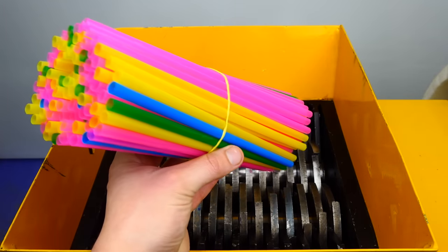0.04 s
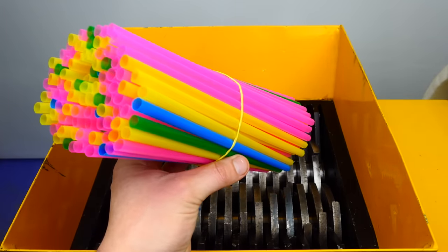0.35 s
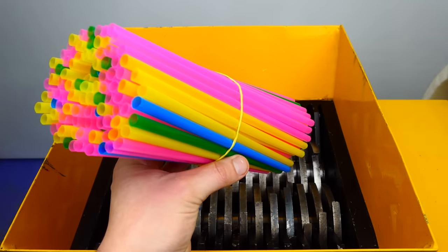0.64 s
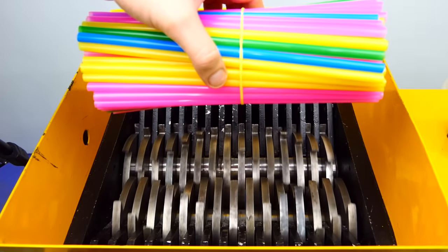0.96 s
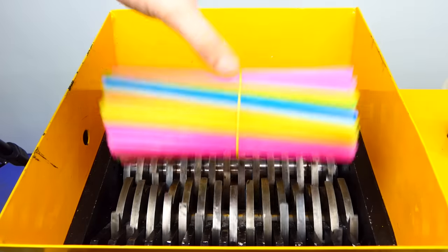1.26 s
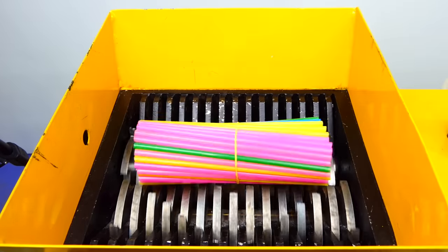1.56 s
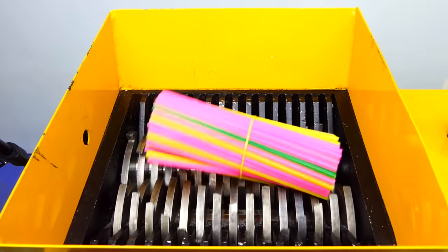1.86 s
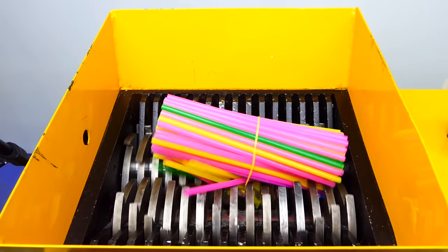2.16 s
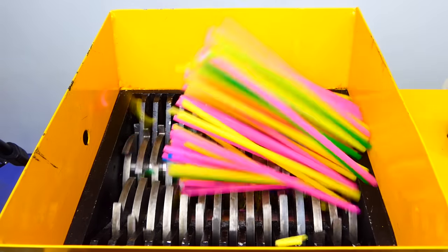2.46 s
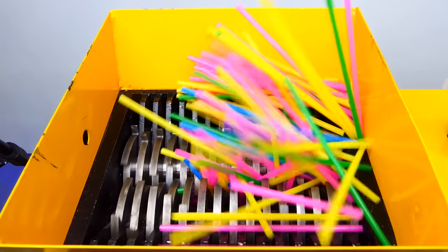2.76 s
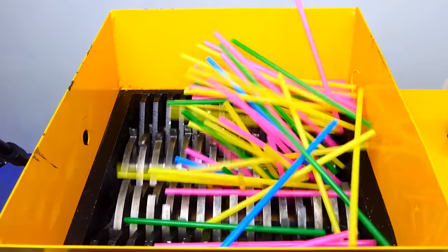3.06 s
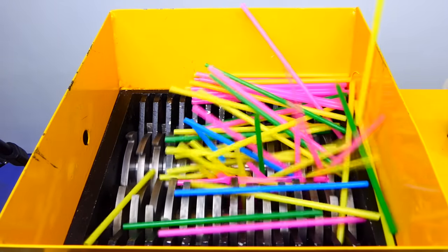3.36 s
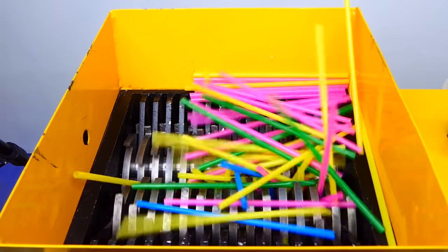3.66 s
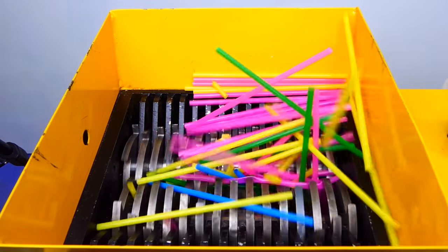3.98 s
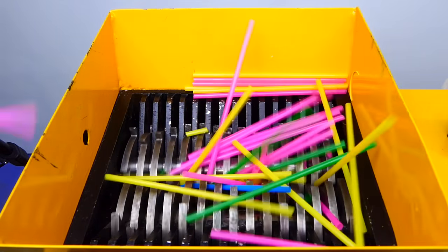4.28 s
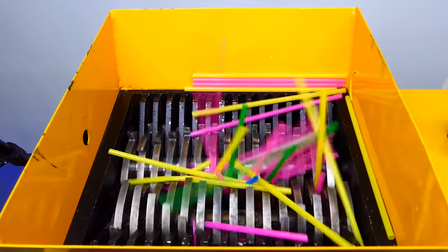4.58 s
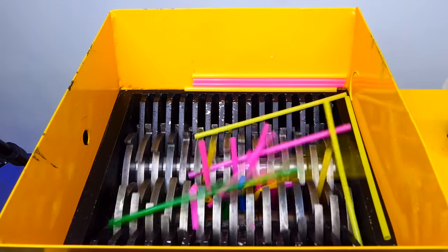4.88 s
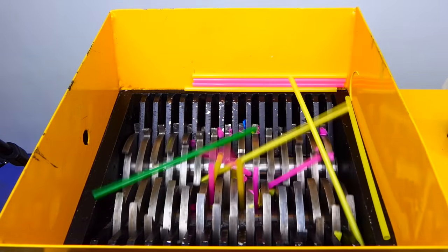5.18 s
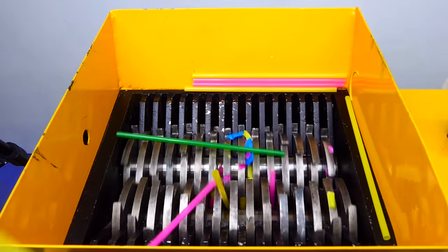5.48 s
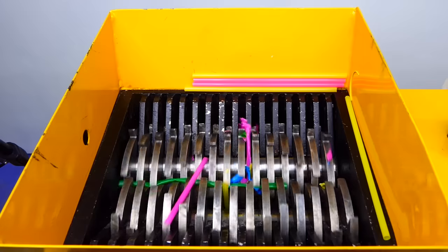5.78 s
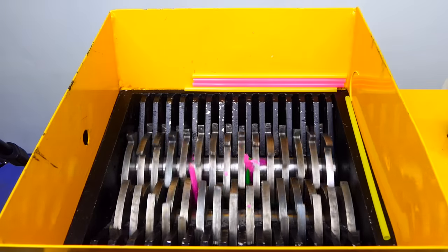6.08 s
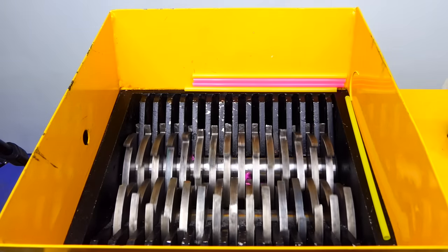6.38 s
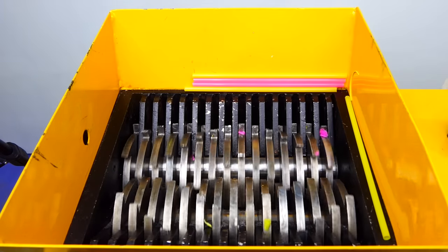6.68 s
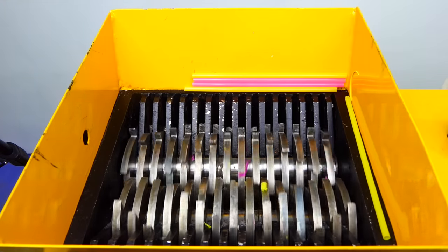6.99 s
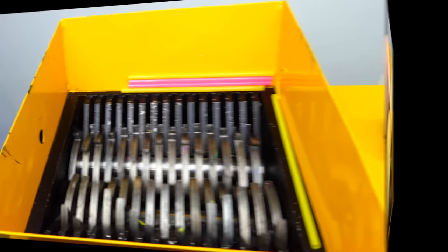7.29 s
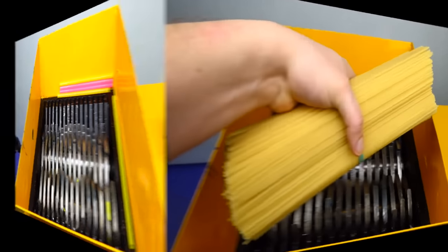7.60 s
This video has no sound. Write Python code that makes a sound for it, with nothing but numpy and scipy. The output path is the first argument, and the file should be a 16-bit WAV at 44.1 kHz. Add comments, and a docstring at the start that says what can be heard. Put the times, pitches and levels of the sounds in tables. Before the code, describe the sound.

Plastic straws slap onto a humming shredder's steel cutters, then crunch, crackle and snap loudly until little but the hum remains.

```python
"""Close microphone at the steel hopper of a twin-shaft shredder in a workshop.
After a short silence the gearbox hums and the empty cutters rub. At 1.4 s a bundle of plastic straws
drops in. The cutters crush the tubes into a dense crackle and snap them one by one, clipping the louder
left channel; the tight bundle groans as it gives way. From about 5 s the crackle thins out,
until only the gearbox hum is left."""
import sys
import numpy as np
from scipy import signal
from scipy.fft import rfft, irfft, next_fast_len
from scipy.io import wavfile
from scipy.ndimage import uniform_filter1d, map_coordinates

SR = 44100
rng = np.random.default_rng(int(sys.argv[2]) if len(sys.argv) > 2 else 0)


def log_audio(samples):
    """Write samples as a 16-bit WAV file to the path given in sys.argv[1]."""
    # one column per channel
    frames = np.atleast_2d(samples).T
    # limit to full scale, then quantise
    limited = np.clip(frames, -1, 1)
    pcm = np.round(limited * 32767).astype(np.int16)
    wavfile.write(sys.argv[1], SR, pcm)


N = 341378

# colour of breaking plastic in the hopper: (frequency [Hz], level [dB])
PLASTIC_SPECTRUM = [(20, -5.5), (100, -23), (250, -9.5), (450, -4), (700, -0.5), (1050, -5.5), (1400, -3),
                    (2100, 0.5), (2600, 0), (3450, 4.5), (4600, -3), (7000, 0), (10500, -3.5),
                    (13000, -2.5), (16000, -4.5)]
# straws that break with a loud snap: (time [s], crack level [dB], brightness [dB])
LOUD_SNAPS = [(1.735, -14, -13), (1.915, -11, -1), (1.938, -3.5, 8), (1.984, -7.5, 2.5), (2.033, -9, 3),
              (2.089, -4, 6), (2.118, -10, -10), (2.156, -11, -8), (2.185, -6.5, -2), (2.219, -8.5, -11),
              (2.328, -14, -8), (2.482, -5, -1), (2.551, -5, -5), (2.579, -7.5, 15), (2.607, -7, 5),
              (2.636, -6, 6), (2.699, -5, 5), (2.73, -7.5, 2), (2.802, -9, 0), (2.883, -6.5, -5),
              (2.978, -6, -3), (3.111, -10, 16), (3.126, -5.5, 19), (3.277, -8, 13), (3.357, -6.5, -21),
              (3.405, -4.5, -5), (3.456, -7.5, -3), (3.549, -9, 5), (3.585, -7, -5), (3.642, -7.5, -9),
              (3.665, -9, 0), (3.778, -6.5, -3), (3.856, -9.5, -5), (3.939, -9.5, -8), (4.069, -3.5, -4),
              (4.083, -13, 2), (4.166, -11, 15), (4.2, -7.5, 2), (4.25, -13, -6), (4.262, -10, 19),
              (4.314, -8.5, -2.5), (4.352, -10.5, -4), (4.436, -16, 17), (4.545, -6, 3), (4.593, -8.5, 2),
              (4.609, -7.5, 6), (4.689, -9, -5), (4.734, -11.5, 1), (4.831, -13, 15), (4.881, -10.5, 14),
              (4.97, -13.5, -6), (5.056, -19, 15), (5.076, -12, -22), (5.089, -12.5, -20),
              (5.115, -13.5, 8), (5.247, -17, -7), (5.306, -13.5, 1), (5.347, -12.5, 5), (5.383, -17.5, 10),
              (5.423, -20, 0), (5.79, -18.5, -6), (5.835, -8, 5), (5.853, -8, -1), (5.913, -9.5, 4),
              (5.94, -12.5, 6), (5.981, -18.5, 14), (6.105, -15.5, -5), (6.298, -15, -12),
              (6.355, -18.5, -11), (6.49, -33, -15), (6.543, -26, -21), (6.623, -24, -11),
              (7.089, -25.5, -14), (7.399, -26.5, 1)]
LANDING_S, FULL_LOAD_DB = 1.371, -18


def straws():
    """Buckling walls crackle; each snap is a crack and a hollow pop, then the rasp of the tearing tube."""
    def burst(power, low_hz, high_hz):
        noise = np.sqrt(np.abs(power)) * rng.standard_normal(N)
        return colour(noise, lambda f: shape(PLASTIC_SPECTRUM, f) * band(f, low_hz, high_hz))

    crumple_db, crunch_db, crackle_db = cutter_load()
    landed = np.arange(N) / SR > LANDING_S
    low_power, mid_power, high_power = [amp(db) ** 2 * landed for db in (crumple_db, crunch_db, crackle_db)]
    crack_mid, crack_high, hollow = snaps(list(LOUD_SNAPS) + lesser_snaps(crunch_db, crackle_db))
    tear_mid, tear_high = tears()
    grain = fractures(per_s=2000, spread_db=3.5, clump_db=2.5, life_s=0.00039)  # shared by all bands
    crushing = mid_power * amp(0.5) + tear_mid
    crumple = burst(low_power * (1 + grain) / 2 + amp(-19) ** 2 * (crack_mid + tear_mid), 46, 1050)
    crunch = burst(crushing * (0.14 + 0.25 * grain) + crack_mid, 950, 4340)
    buckles = np.sqrt(crushing) * amp(-5.5) * buckling(960, 4368, t60=0.018, spread_db=7.5)
    splitting = high_power * amp(1) + tear_high
    crackle = burst(splitting * 0.64 * grain + crack_high, 3500, 18500)
    splinters = np.sqrt(splitting) * amp(-10) * buckling(4420, 15250, t60=0.054, spread_db=2)
    return crumple + crunch + buckles + crackle + splinters + hollow


def cutter_load():
    """Crumple, crunch and crackle in dB: they swell as each row of teeth bites; more load is brighter."""
    # how hard the cutters work on the straws: (time [s], level [dB])
    load = [(1.42, -32), (1.85, -27.5), (2.0, -24.5), (2.1, -20), (3.1, -18), (3.25, -19), (3.7, -19),
            (4.3, -21.5), (4.72, -26), (4.9, -21.5), (5.4, -30), (5.9, -31), (6.15, -32), (6.35, -31.5),
            (6.5, -36), (6.8, -39.5), (7.3, -42.5), (7.7, -61)]
    # low crumple, strongest while the bundle is still tight: (time [s], level [dB])
    crumple = [(1.4, -42), (1.6, -29.5), (2.15, -28), (3.3, -31.5), (3.7, -39), (4.95, -38.5), (5.5, -43),
               (6.2, -55.5), (7.4, -43), (7.7, -63)]
    bite_period_s, bite_at_s, first_split_s = 0.2449, 4.08, 1.91
    t = np.arange(N) / SR
    bite_db = 0.75 * np.cos(2 * np.pi * (t - bite_at_s) / bite_period_s)
    load_db = curves(load)[0] + bite_db
    crackle_db = FULL_LOAD_DB + 1.26 * (load_db - FULL_LOAD_DB) - 7.5 * (t < first_split_s)
    return curves(crumple)[0] + bite_db, load_db, crackle_db


def snaps(rows):
    """Breaking straws: the mid and treble power of their cracks, and the hollow pop of the tubes."""
    tube_hz, mid_t60, treble_t60, tube_t60 = 3426, 0.026, 0.0083, 0.014
    mid, high, hollow = np.zeros((3, N))
    t = np.arange(SR // 12) / SR
    pitches = tube_hz * np.exp(0.059 * rng.standard_normal(400))
    attack = 1 - np.exp(-t / 0.00026)
    for (s, crack_db, bright_db), hz in zip(rows, pitches):
        treble = treble_share(bright_db)
        add(mid, s, (1 - treble) * amp(crack_db + 2.5 - 60 * t / mid_t60) ** 2)
        add(high, s, treble * amp(crack_db + 8.5 - 60 * t / treble_t60) ** 2)
        envelope = np.sqrt(1 - treble) * amp(crack_db + 3.5 - 60 * t / tube_t60) * attack
        add(hollow, s, envelope * np.sin(2 * np.pi * hz * t))
    return mid, high, hollow


def lesser_snaps(crunch_db, crackle_db):
    """Small random breaks, as rows like LOUD_SNAPS: more frequent, louder and brighter under load."""
    full_load_per_s = 22
    rows = []
    for k, (shift, size, tone, luck) in enumerate(rng.uniform(-1, 1, (300, 4))):
        s = LANDING_S + (k + 2 + shift) / full_load_per_s
        at = int(s * SR)
        if at < N and abs(luck) < amp(.45 * (crunch_db[at] - FULL_LOAD_DB)):
            bright_db = crackle_db[at] - crunch_db[at] + 3 + 1.5 * tone
            rows.append((s, crunch_db[at] + 6.5 + 4.5 * size, bright_db))
    return rows


def tears():
    """Mid and treble power of tearing tubes: long rips, and a shorter rasp after each loud snap."""
    # straws that a tooth drags and rips open: (time [s], rasp level [dB], brightness [dB])
    long_rips = [(1.458, -20, -12), (1.612, -20.5, -28), (1.665, -17.5, -8), (1.828, -17.5, -10),
                 (2.066, -11, -3), (2.117, -10, -2), (2.186, -13, -7), (2.22, -10.5, -3), (2.267, -10, 1.5),
                 (2.315, -9, 0), (2.367, -11, 3), (2.415, -7, 0), (2.481, -10, 3), (2.73, -25, 5),
                 (2.823, -9, 8), (3.026, -11, -4), (3.052, -9.5, -2), (3.077, -10, 2), (3.292, -17, 4),
                 (3.404, -10, -13), (3.559, -12, -1), (3.585, -30, -8), (3.624, -12.5, -7),
                 (3.663, -15.5, -3), (3.778, -25, -4), (3.837, -11.5, -7), (4.022, -13, -1),
                 (4.059, -12, -5), (4.084, -12.5, 11), (4.53, -12.5, -2), (4.595, -24, -4),
                 (4.639, -17.5, 0), (4.666, -17, -6), (4.734, -19, -3), (4.864, -12, -1.5),
                 (5.054, -22, 14), (5.147, -17.5, -4), (5.258, -16, 0), (5.638, -23, -9),
                 (5.836, -10.5, -1), (5.914, -20, 7.5), (6.012, -17, 6.5), (6.155, -27, -7),
                 (6.277, -12, -7.5), (6.312, -22, -3), (6.875, -29, -1), (7.155, -33, -2)]
    long_t60, short_t60 = 0.078, .05
    rips = [(s, db, bright_db, long_t60) for s, db, bright_db in long_rips]
    rips += [(s, db - 9.5, bright_db, short_t60) for s, db, bright_db in LOUD_SNAPS]
    mid, high = np.zeros((2, N))
    t = np.arange(SR // 12) / SR
    for s, db, bright_db, t60 in rips:
        treble = treble_share(bright_db)
        rasp = amp(db - 60 * np.maximum(t - .011, 0) / t60) ** 2 * np.minimum(t / 0.0017, 1)
        add(mid, s, (1 - treble) * rasp * amp(1) ** 2)
        add(high, s, treble * rasp)
    return mid, high


def fractures(per_s, spread_db, clump_db, life_s):
    """Power of countless tiny breaks, in clumps, with a local mean of 1."""
    sizes = amp(spread_db * np.minimum(rng.standard_normal(N), 2.3) + clump_db * wobble(110))
    impulses = (rng.random(N) < per_s / SR) * sizes ** 2
    power = signal.lfilter([1], [1, -np.exp(-1 / (life_s * SR))], impulses)
    return power / local_mean(power)


def buckling(low_hz, high_hz, t60, spread_db, count=4000):
    """Many small buckles, each ringing at its own pitch and cut off within 7 ms, at a local rms of 1."""
    when, pitch, phase = rng.random((3, count, 1))
    size = amp(spread_db * np.minimum(rng.standard_normal((count, 1)), 2))
    age = np.arange(SR // 150)
    hz = low_hz + (high_hz - low_hz) * pitch
    rings = size * amp(-60 * age / SR / t60) * np.sin(2 * np.pi * (hz * age / SR + phase))
    scattered = np.bincount(((when * N).astype(int) + age).ravel(), rings.ravel(), N)[:N]
    plastic = colour(scattered, lambda f: shape(PLASTIC_SPECTRUM, f))
    return plastic / np.sqrt(local_mean(plastic ** 2))


def pops_and_knocks():
    """Further hollow pops of snapping tubes near 3.5 kHz, each with its own pitch, and knocked scraps and teeth
    ring briefly, a little off a pure tone."""
    # further hollow pops of snapping tubes, and ringing scraps and teeth: (time [s], level [dB], pitch [Hz],
    # t60 [s])
    rings = [(2.033, -3, 3570, 0.026), (3.111, 0, 3650, 0.028), (3.29, -4, 3230, .035),
             (3.412, -5.5, 1177, 0.067), (3.642, -2.5, 3270, 0.045), (3.857, -10, 2980, .04),
             (3.938, -4, 2730, 0.038), (4.203, -12.5, 1322, 0.077), (4.951, -18.5, 454, 0.1),
             (5.292, -13.5, 1665, 0.058), (5.84, -8, 1148, 0.05), (5.853, 6.5, 3590, 0.026),
             (6.29, -9.5, 1232, 0.19), (7.299, -18, 1810, 0.075), (7.421, -22, 1815, 0.081)]
    out, t = np.zeros(N), np.arange(SR // 4) / SR
    attack = 1 - np.exp(-t / 0.00069)
    for s, db, hz, t60 in rings:
        drift = 0.05 * np.cumsum(rng.standard_normal(len(t)))
        add(out, s, amp(db - 60 * t / t60) * attack * np.sin(2 * np.pi * hz * t + drift))
    return out


def landing():
    """The bundle slaps onto the cutters and thumps the frame; its straws clatter, then settle."""
    # colour of the bundle hitting the cutters: (frequency [Hz], level [dB])
    slap_spectrum = [(20, -13), (60, -1), (150, -8), (400, -5), (1100, -1), (2000, -1), (3300, 0.5),
                     (5000, -5), (9000, -15), (16000, -14.5)]
    slap, thump, t = np.zeros(N), np.zeros(N), np.arange(SR // 4) / SR
    clatter = (amp(-1.5 - 60 * t / 0.06) + amp(-25 - 60 * t / 0.22)) * (1 - np.exp(-t / 0.00031))
    add(slap, LANDING_S, clatter * rng.standard_normal(len(t)))
    add(thump, LANDING_S, amp(-24 - 60 * t / .1) * np.sin(2 * np.pi * 66 * t))
    return colour(slap, lambda f: shape(slap_spectrum, f)) + thump


def groan():
    """Squeezed tubes rub on each other in a rough tone that sinks as the bundle loosens."""
    # the tight bundle giving way: (time [s], pitch [Hz], level [dB])
    glide = [(2.3, 820, -80), (2.42, 676, -32), (2.59, 429.4, -27), (2.95, 400, -65)]
    hz, db = curves(glide)
    phase = 2 * np.pi * np.cumsum(hz) / SR
    t = np.arange(N) / SR
    squeezed = (t > glide[0][0]) & (t < glide[-1][0])
    return squeezed * amp(db) * (wobble(90) * np.sin(phase) + wobble(90) * np.cos(phase))


def gearbox():
    """Wavering gear tones over the churning casing, the hiss of teeth and the whine of rubbing steel."""
    # the running drive: (time [s], hum level [dB], hiss level [dB])
    drive = [(.75, -29, -35.5), (1.12, -27, -34.5), (1.35, -33.5, -35.5), (4, -40.5, -36), (5, -38.5, -34),
             (6.65, -35, -38), (7, -27.5, -36.5), (7.2, -33, -34), (7.5, -31.5, -38.5), (7.74, -42, -47.5)]
    # gear tones: (frequency [Hz], level [dB])
    gear_tones = [(254, -10.5), (317.6, -4), (441.4, -7.5), (624.5, -10), (872, -13.5), (963.6, -19),
                  (1846, -15)]
    # resonances of the casing: (frequency [Hz], width [Hz], level [dB])
    casing_modes = [(259, 46, -3), (308, 24, 2), (412, 22.5, 2), (430, 21, 4), (625, 70, -11),
                    (834, 160, -16.5)]
    # rumble and hiss of the gears: (frequency [Hz], level [dB])
    hiss_spectrum = [(20, -3), (55, 0), (150, 6), (700, 1), (1100, 3.5), (1650, -2), (2000, 2.5), (2500, 2),
                     (3700, 5), (4500, -5.5), (8500, -14), (10000, -19.5), (16000, -28)]
    # the empty cutters rubbing on each other: (time [s], level [dB])
    cutter_rub = [(.75, -39), (.97, -36), (1.15, -53), (1.4, -70)]

    def casing_gain(f):
        return np.abs(sum((-1) ** k * amp(db) * 1j * f * width / (hz * hz - f * f + 1j * f * width)
                          for k, (hz, width, db) in enumerate(casing_modes)))

    hum_db, hiss_db = curves(drive)
    t, start_s = np.arange(N) / SR, .748
    tones = sum(amp(db + 4.5 * wobble(9)) * np.sin(2 * np.pi * hz * t + 0.9 * wobble(16))
                for hz, db in gear_tones)
    casing = colour(rng.standard_normal(N) * amp(0.87 * wobble(5.9)), casing_gain)
    hum = amp(-6) * unit(tones) + amp(-3) * casing
    hiss = colour(rng.standard_normal(N) * amp(1.8 * wobble(70)), lambda f: shape(hiss_spectrum, f))
    whine = colour(rng.standard_normal(N), lambda f: band(f, 2080, 2020, order=30))
    return (t > start_s) * (amp(hum_db) * hum + amp(hiss_db) * hiss + amp(curves(cutter_rub)[0]) * whine)


def hopper(x, t60, dull_hz):
    """Echoes between the steel walls and from the workshop, different on each side of the microphone."""
    t = np.arange(SR // 3) / SR
    tail = rng.standard_normal((2, len(t))) * amp(-60 * t / t60) * (t > .002)
    tail /= np.linalg.norm(tail[0])
    tail = signal.lfilter(*signal.butter(1, dull_hz, fs=SR), tail)
    return signal.oaconvolve(x[None], tail, axes=1)[:, :N]


def amp(db):
    """Decibels to gain."""
    return 10 ** (np.asarray(db) / 20)


def unit(x):
    """x at rms 1."""
    return x / np.sqrt(np.mean(x ** 2) + 1e-20)


def local_mean(power):
    """Running mean over 41 ms, kept above zero."""
    return np.abs(uniform_filter1d(power, size=1800)) + 1e-9


def treble_share(bright_db):
    """Share of power in the treble, from the treble-to-mid ratio."""
    return 1 / (1 + amp(-bright_db) ** 2)


def curves(rows):
    """One value per sample for each column after the time."""
    s, *cols = np.transpose(rows)
    return [np.interp(np.arange(N) / SR, s, c) for c in cols]


def wobble(rate):
    """A smooth random curve, rate knots a second."""
    knots = np.random.default_rng(rng.integers(2 ** 31)).standard_normal(int(N * rate / SR) + 4)
    coarse = np.arange(0, N + 32, 32)
    return np.interp(np.arange(N), coarse, map_coordinates(knots, [coarse * rate / SR], order=2))


def shape(points, hz):
    """Gain of (frequency [Hz], level [dB]) points on a log axis."""
    f, db = np.transpose(points)
    return amp(np.interp(np.log(hz + 1), np.log(f), db))


def colour(x, gain):
    """x through a causal filter that keeps the power of white noise."""
    size = 4096
    cepstrum = irfft(np.log(unit(gain(np.fft.rfftfreq(size, 1 / SR))) + 1e-6))
    cepstrum[1:size // 2] *= 2  # fold to minimum phase
    cepstrum[size // 2 + 1:] = 0
    return signal.oaconvolve(x, irfft(np.exp(rfft(cepstrum))))[:N]


def band(hz, low_hz, high_hz, order=4):
    """Gain of a band-pass."""
    return ((1 + (low_hz / (hz + 1)) ** (2 * order)) * (1 + (hz / high_hz) ** (2 * order))) ** -.5


def add(track, s, sound):
    """Mix a sound into a track at time s."""
    part = track[round(s * SR):][:len(sound)]
    part += sound[:len(part)]


def scene():
    """Machine and straws, close up and well to the left of the microphone."""
    direct = gearbox() + straws() + groan() + pops_and_knocks() + landing()
    echoes = amp(-10.5) * hopper(direct, t60=0.26, dull_hz=6100)
    return (direct + echoes) * amp([[3.6], [-5.7]])


def record(dry):
    """At this close distance the peaks clip at full scale; a steep low-pass follows."""
    top_hz = 15900
    clipped = np.clip(dry, -1, 1)
    size = next_fast_len(N + SR // 4)
    hz = np.fft.rfftfreq(size, 1 / SR)
    return irfft(rfft(clipped, size) / (1 + (hz / top_hz) ** 160), size)[:, :N]


dry = scene()
out = record(dry)
log_audio(out)
```